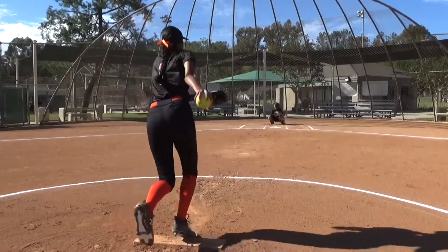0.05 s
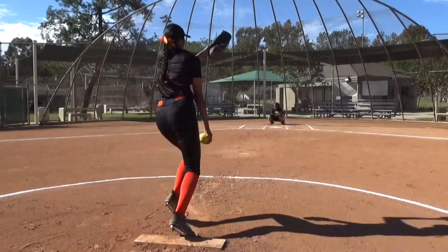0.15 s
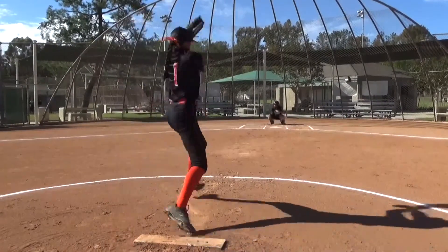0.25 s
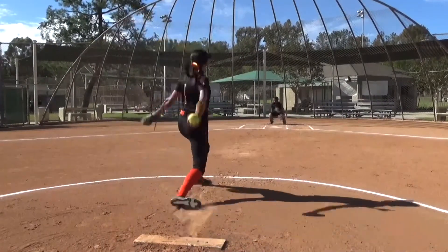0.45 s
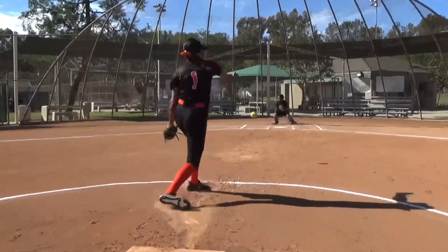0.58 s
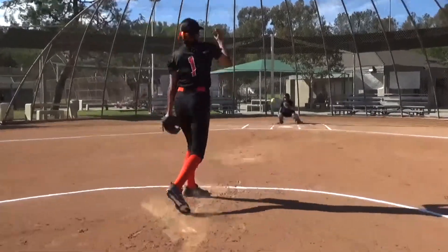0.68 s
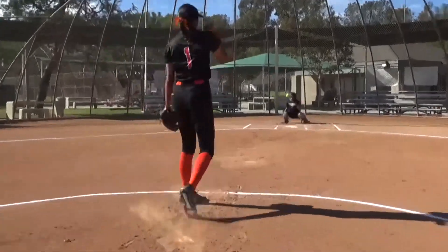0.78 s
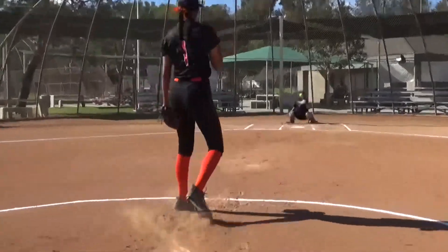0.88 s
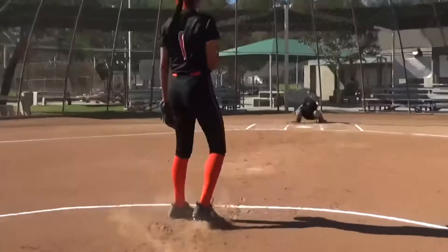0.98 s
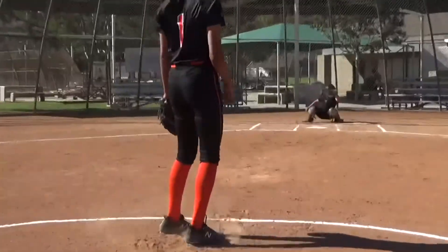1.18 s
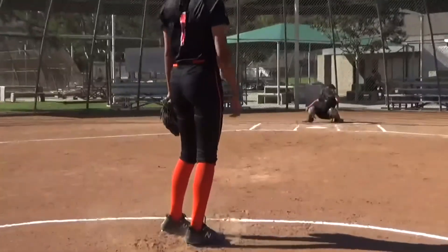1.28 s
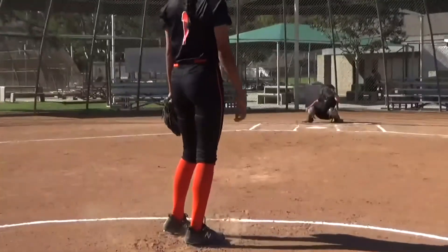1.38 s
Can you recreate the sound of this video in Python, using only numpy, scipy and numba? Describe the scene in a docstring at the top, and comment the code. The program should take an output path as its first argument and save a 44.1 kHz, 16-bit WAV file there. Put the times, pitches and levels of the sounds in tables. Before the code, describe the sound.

Cleats grinding and clacking on infield dirt during a softball pitch, ending with a soft pop.

```python
"""A shoe shuffles on a dirt infield: a softball pitcher, with the microphone close behind, near the ground.
The shoe grinds off the rubber and drags, crushing grains while its sole rings and chatters.
Cleats clack and slide as she comes to a stop, and a last dull, leathery pop follows.
Fences and stands scatter a thin tail over the faint wash of the open field."""
import sys
import numpy as np
from scipy import signal
from scipy.fft import rfft, irfft
from scipy.io import wavfile
from scipy.ndimage import uniform_filter1d
from numba import njit

SR = 44100
rng = np.random.default_rng(int(sys.argv[2]) if len(sys.argv) > 2 else 0)


def master(y):
    """Save y as 16-bit WAV."""
    cut = np.clip(np.atleast_2d(y).T, -1, 1)
    pcm = np.round(cut * 32767)  # scale
    wavfile.write(sys.argv[1], SR, pcm.astype(np.int16))


N = 63945
T = np.arange(N) / SR


def from_db(db):
    """Decibels to gain."""
    return 10 ** (np.asarray(db) / 20)


def rms_one(x):
    """Scale to unit power."""
    return x / np.sqrt(np.mean(x ** 2) + 1e-20)


def evened(x, window_s=0.0126):
    """Hold the slow level at one and keep the fine grain."""
    return x / np.sqrt(uniform_filter1d(x * x, int(window_s * SR) + 1) + 1e-12)


def butter(x, hz, kind, order=2):
    """Causal Butterworth filter."""
    sections = signal.butter(order, np.clip(hz, 10, .45 * SR), kind, fs=SR, output="sos")
    return signal.sosfilt(sections, x + 1e-18)


def coloured(x, spectrum):
    """Give a noise the spectrum in a table."""
    hz, db = np.transpose(spectrum)
    bins_hz = np.maximum(np.arange(N // 2 + 1) * SR / N, 1)
    return irfft(rfft(x) * from_db(np.interp(np.log(bins_hz), np.log(hz), db)), N)


def click(s):
    """A unit click at a given time."""
    return 1. * (np.arange(N) == int(s * SR))


def ring(x, hz, t60):
    """A unit click sets a sine of height 1 ringing."""
    radius, angle = from_db(-60 / (t60 * SR)), 2 * np.pi * hz / SR
    return signal.lfilter([0, np.sin(angle)], [1, -2 * radius * np.cos(angle), radius ** 2], x + 1e-18)


@njit
def glide(x, angle, radius):
    """Resonance whose centre moves."""
    y = np.zeros(len(x))
    for i in range(2, len(x)):
        y[i] = x[i] - x[i - 2] + 2 * radius * np.cos(angle[i]) * y[i - 1] - radius * radius * y[i - 2]
    return y


def echoed(x, echo_db, delay_s=0.00182):
    """A near reflection reaches the microphone just after the blow."""
    return x + from_db(echo_db) * np.interp(T - delay_s, T, x, left=0)


def stereo(mid, side):
    """Left and right from middle and side."""
    return np.array([mid + side, mid - side])


def pan(left_db):
    """Channel gains that put the left this far above the right."""
    return from_db(left_db * np.array([[.5], [-.5]]))


# Wash of the open field: (frequency [Hz], relative level [dB])
WASH_SPECTRUM = [(15, -56), (25, -22), (64, -13), (118, -2.5), (412, -11.5), (531, -2.5), (740, -7.5),
                 (884, -5), (1170, -6), (1260, -7), (1510, -16.5), (1850, -10), (2640, -21.5), (3080, -18),
                 (5120, -26.5), (6280, -27), (11000, -34), (14300, -84), (22000, -120)]
# Its width at the microphone: (frequency [Hz], side against middle [dB])
WASH_WIDTH = [(30, -15), (140, -27), (500, -16.5), (900, -11.5), (3150, -5), (11000, -6)]


def field_wash(level_db=-53):
    """Steady wash of distant air and traffic."""
    mid, side = [rms_one(coloured(rng.standard_normal(N), WASH_SPECTRUM)) for _ in range(2)]
    return from_db(level_db) * stereo(mid, coloured(side, WASH_WIDTH))


# Colour of what fences and stands send back: (frequency [Hz], relative level [dB])
FENCE_SPECTRUM = [(150, 0), (550, -1.5), (1300, -4.5), (3500, 0.5), (10000, -12)]


def fence_scatter(x, level_db=-21.5, side_db=-10, t60=0.46, rise_s=0.014):
    """Fences and stands return a thin outdoor tail, nearly alike in both channels."""
    envelope = from_db(-60 * T / t60) * (1 - np.exp(-T / rise_s))
    tails = [coloured(rng.standard_normal(N), FENCE_SPECTRUM) * envelope for _ in range(2)]
    mid, side = [signal.fftconvolve(x, tail / np.linalg.norm(tail))[:N] for tail in tails]
    return from_db(level_db) * stereo(mid, from_db(side_db) * side)


# Brief ring of the leather: (frequency [Hz], level [dB], t60 [s])
LEATHER_MODES = [(620, -15, 0.0086), (1160, -5.5, 0.004), (1796, -8.5, 0.0056), (5300, -18, 0.0028)]


def leather_pop(at_s=1.1345):
    """One soft, heavily damped smack on leather."""
    modes = sum((-1) ** k * from_db(db) * ring(click(at_s), hz, t60)
                for k, (hz, db, t60) in enumerate(LEATHER_MODES))
    dull = butter(butter(modes, 390, "high", order=3), 5600, "low", order=8)
    return echoed(dull, echo_db=-10)


# The sole lands on the packed infield: (time [s], level [dB], pitch [Hz], t60 [s])
SOLE_LANDINGS = [(.187, -24.5, 556, 0.027), (.331, -30, 272, 0.043), (.3508, -14, 964, 0.012),
                 (.8485, -25.5, 620, 0.031), (.876, -26, 503, .03)]


def sole_knocks():
    """A hollow, quickly damped note, its pitch set by how the sole lands."""
    return sum(from_db(db) * butter(ring(click(s), hz, t60), 0.66 * hz, "high")
               for s, db, hz, t60 in SOLE_LANDINGS)


# Clods give way underfoot: (time [s], level [dB], low edge [Hz], high edge [Hz], half length [s])
CLODS = [(.101, -40.5, 1690, 2530, 0.0022), (.203, -27.5, 900, 2480, 0.0011),
         (0.2065, -31, 3300, 10400, 0.001), (0.2192, -25.5, 3100, 4930, 0.0012),
         (0.23, -32, 3800, 5600, 0.0032), (.265, -22.5, 790, 1210, .0015),
         (0.2844, -22, 1670, 2200, 0.0022), (.334, -36, 3020, 4520, 0.0033),
         (0.8511, -34, 1150, 2300, 0.0039), (0.878, -30.5, 750, 1900, 0.0031),
         (0.9175, -31.5, 655, 1490, 0.0012), (.944, -27.5, 650, 2300, 0.0024)]


def clod_crunches():
    """Each clod crumbles in a brief swell of coarse grains."""
    out = 0
    for s, db, low, high, half_s in CLODS:
        swell = np.exp(-.5 * ((T - s) / half_s) ** 2)
        burst = swell * butter(grains(per_s=3000, spread_db=2.6), [low, high], "band", order=3)
        out += from_db(db) * burst * np.linalg.norm(swell) / np.linalg.norm(burst)
    return out


# Cleats and pebbles strike close to the microphone: (time [s], level [dB], low edge [Hz],
# high edge [Hz], crunch against snap [dB], crunch decay [s], echo against snap [dB])
CLEAT_STRIKES = [(.0523, -24.5, 1100, 2780, -29, 0.0011, -20), (.1867, -19, 1190, 3000, -23.5, .0015, -17),
                 (.3502, -15.5, 3940, 5370, -20, 0.0017, -7), (0.3516, -21, 2840, 3250, -26.5, .0015, -21),
                 (.4935, -23, 2500, 9000, -18, 0.0012, -19), (0.5431, -31, 2480, 6000, -19, 0.00091, -11),
                 (0.6103, -30.5, 2400, 5200, -13, 0.0016, 1), (0.6273, -35.5, 2600, 3830, -13, 0.0023, -5),
                 (0.8475, -26.5, 1480, 3840, -13.5, 0.0057, -7),
                 (0.8735, -6, 2180, 5660, -21.5, 0.0034, 1.5),
                 (0.9371, -7.5, 1510, 5900, -18.5, 0.0034, -13), (1.042, -35.5, 3200, 8840, -16, .0015, -1),
                 (1.276, -43, 1500, 3940, -13.5, .003, -6)]


def cleat_clacks(shelf_hz=6300, treble_db=-4.5):
    """Each strike is a snap and a short crunch of dirt, with the top softened."""
    out = 0
    for s, db, low, high, crunch_db, decay_s, echo_db in CLEAT_STRIKES:
        snap = click(s)
        crunch = from_db(crunch_db) * rng.standard_normal(N) * (T > s) * np.exp(-abs(T - s) / decay_s)
        snap_peak = abs(butter(snap, [low, high], "band")).max()
        blow = butter(echoed(snap, echo_db) + crunch, [low, high], "band")
        out += from_db(db) * blow / snap_peak
    treble = from_db(treble_db) * butter(out, shelf_hz, "high", order=4)
    return butter(out, shelf_hz, "low", order=8) + treble


def grains(per_s, spread_db, hiss=0.53):
    """Crushed grains of uneven size on a smooth hiss."""
    sizes = from_db(spread_db * np.minimum(rng.exponential(1, N), 5)) * rng.choice([-1, 1], N)
    crushed = rng.random(N) < per_s / SR
    return rms_one(sizes * crushed) + hiss * rng.standard_normal(N)


def resonance(friction, track, width_hz):
    """Friction drives a resonance that follows a pitch and a level."""
    s, hz, db = np.transpose(track)
    note = glide(friction, 2 * np.pi * np.interp(T, s, hz) / SR, np.exp(-np.pi * width_hz / SR))
    return evened(note) * from_db(np.interp(T, s, db))


# Hollow ring of the sole: (time [s], pitch [Hz], level against the plain rubbing [dB])
HOLLOW_RING = [(.1, 650, -5.5), (.21, 600, 6), (.255, 686, -3.5), (.29, 650, -3.5), (.33, 612, -1.5),
               (.415, 567, 9.5), (.46, 448, 5), (.52, 583, 0.5), (.88, 502, -7), (.92, 555, 5),
               (1.01, 546, 3), (1.09, 583, -3.5)]
# Chatter of the sole: (time [s], pitch [Hz], level against the plain rubbing [dB])
STICK_SLIP = [(.1, 1130, -4.5), (.222, 1510, 7), (.238, 1390, -17), (.252, 1190, 9), (.266, 960, -9.5),
              (0.283, 1845, 1.5), (.31, 1640, 3.5), (.37, 1050, -9), (.52, 1040, 4), (.94, 1390, -15),
              (1.09, 1250, -6.5)]


def ringing_sole(rubbing, per_s, spread_db):
    """On top of its rubbing, the sole rings hollow and chatters as it sticks and slips."""
    hollow = resonance(grains(per_s, spread_db), HOLLOW_RING, width_hz=48)
    chatter = resonance(grains(per_s, spread_db), STICK_SLIP, width_hz=276)
    return butter(rubbing + hollow + chatter, [400, 3600], "band", order=3)


def stroke_gain(stroke, band, fade_db_per_s=1800):
    """Gain of one band through a stroke of the shoe, dying quickly outside it."""
    s, *band_db = np.transpose(stroke)
    outside_s = np.maximum(s[0] - T, 0) + np.maximum(T - s[-1], 0)
    return from_db(np.interp(T, s, band_db[band]) - fade_db_per_s * outside_s)


# Three strokes of the shoe, from close behind: (time [s], bass [dB], body [dB], grit [dB], dust [dB])
SHOE_SHUFFLE = [(0.003, -72, -48.5, -52.5, -65), (0.012, -66, -42, -44.5, -52.5),
                (0.02, -56, -52.5, -54, -70), (0.035, -83, -48.5, -48.5, -69.7),
                (0.065, -73, -54, -57, -72.3), (0.09, -63, -44, -53, -65), (0.103, -52, -38, -39, -58.5),
                (0.113, -57.5, -60, -65, -70), (0.165, -69, -61, -58, -69)]
SHOE_PUSH_AND_DRAG = [(0.184, -61, -54, -49, -56), (0.196, -40.5, -44.5, -51, -52),
                      (0.204, -42, -32, -30, -38), (0.213, -38.5, -32, -37, -42.5),
                      (0.221, -41, -26.5, -33.5, -39.5), (0.239, -49, -36.5, -35.5, -46),
                      (0.252, -41.5, -21.5, -28.5, -41.5), (0.267, -57, -24.5, -26.5, -41),
                      (0.275, -49, -25.5, -34, -42.5), (0.285, -48, -21.5, -27, -38),
                      (0.296, -50, -31, -32.5, -49), (0.312, -61, -29.5, -34.5, -46),
                      (0.326, -54, -41, -38, -55), (0.335, -47, -37, -50, -43.5),
                      (0.345, -50.5, -44, -45, -51), (0.365, -52, -47.5, -41, -47.5),
                      (0.415, -48.5, -37.5, -42.5, -56.5), (0.45, -60, -44, -49.5, -52),
                      (0.492, -51, -42, -41, -52.5), (0.503, -56, -56, -56.5, -64),
                      (0.52, -62, -43.5, -38, -55.5), (0.55, -79, -57.5, -54, -66),
                      (0.6, -62, -58, -57.5, -71), (0.629, -67, -46, -44, -60.5),
                      (0.67, -69, -57.5, -56.5, -69), (0.74, -62.5, -77, -62, -68.5),
                      (0.84, -72, -72, -59, -65)]
SHOE_SLIDE = [(0.86, -68, -53, -67, -68), (0.881, -57, -46, -43, -50), (0.887, -57, -46, -54, -61),
              (0.9, -61, -43.5, -41.5, -62), (0.917, -66, -35, -33, -58), (0.933, -62, -31.5, -31, -61),
              (0.944, -52, -36, -33, -58), (0.953, -63, -46.5, -50, -72), (0.985, -70, -44.5, -46.5, -70),
              (1.03, -58, -52.5, -53.5, -84), (1.09, -74, -47.5, -55, -75), (1.125, -66, -60, -60, -73),
              (1.19, -60.5, -57, -66, -76)]
# Bass, body, grit and dust of the infield dirt:
# (low edge [Hz], high edge [Hz], trim [dB], grain rate [1/s], spread of grain sizes [dB])
GRAIN_BANDS = [(204, 344, 1, 2000, 2.5), (468, 2150, -0.5, 2500, 2.5), (2300, 5660, -2, 1500, 3.5),
               (6000, 10800, -1.5, 2500, 4.5)]


def shoe_scrapes(low_cut_hz=142):
    """Grains crush under the shoe, just in front of the microphone."""
    out = 0
    for band, (low, high, trim_db, per_s, spread_db) in enumerate(GRAIN_BANDS):
        mid, side = [rms_one(butter(grains(per_s, spread_db), [low, high], "band", order=3))
                     for _ in range(2)]
        if band == 1:  # the sole sounds in the body band
            mid = ringing_sole(mid, per_s, spread_db)
        gain = sum(stroke_gain(stroke, band) for stroke in (SHOE_SHUFFLE, SHOE_PUSH_AND_DRAG, SHOE_SLIDE))
        side_db = -23 + 2 * band  # higher bands spread wider
        out += gain * from_db(trim_db) * stereo(evened(mid), from_db(side_db) * side)
    return butter(out, low_cut_hz, "high", order=4)


def scene():
    """Close footwork and the pop, their scatter, and the open field beyond."""
    footwork = shoe_scrapes() + clod_crunches() + sole_knocks() + cleat_clacks() * pan(left_db=-1.4)
    pop = leather_pop()
    tail = fence_scatter(footwork.mean(axis=0) + from_db(-13) * pop)
    return footwork + pop * pan(left_db=1) + tail + field_wash()


def record(dry):
    """At the microphone the treble leans a little to the right; the top is cut."""
    treble = butter(dry, 2500, "high", order=1)
    tilted = dry + treble * (pan(left_db=-0.74) - 1)
    top_cut = signal.ellip(10, .2, 75, 11300, fs=SR, output="sos")
    return signal.sosfilt(top_cut, tilted)


dry = scene()
out = record(dry)
master(out)
```